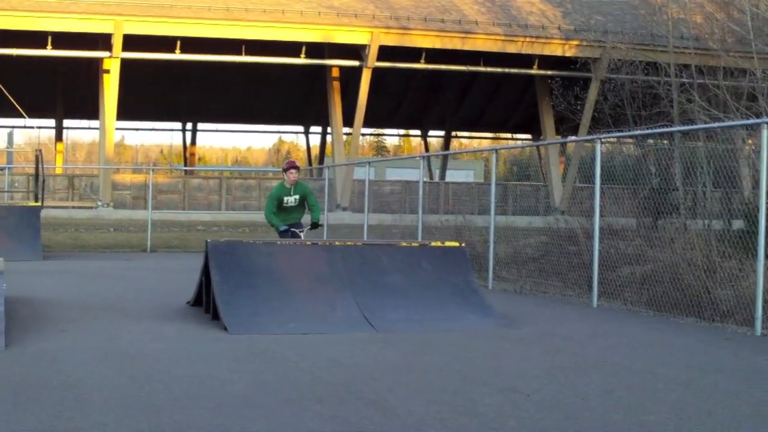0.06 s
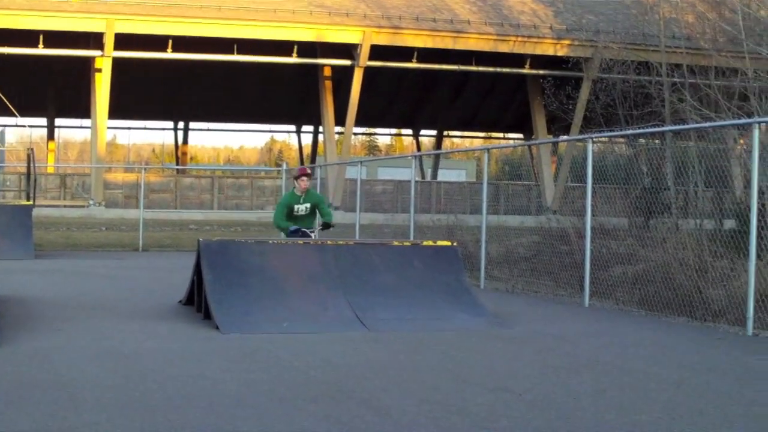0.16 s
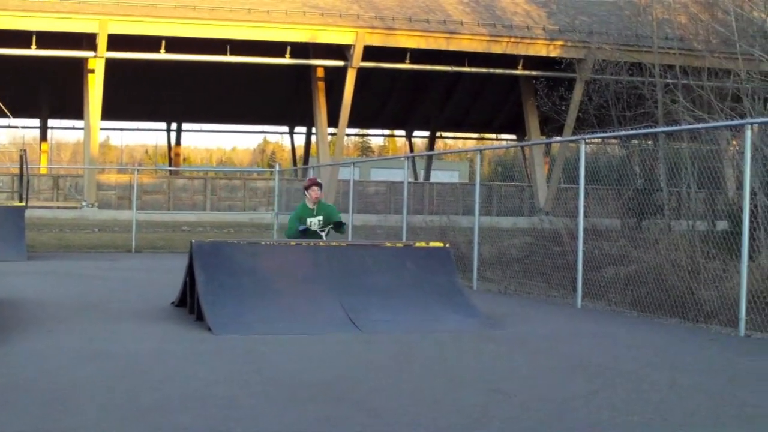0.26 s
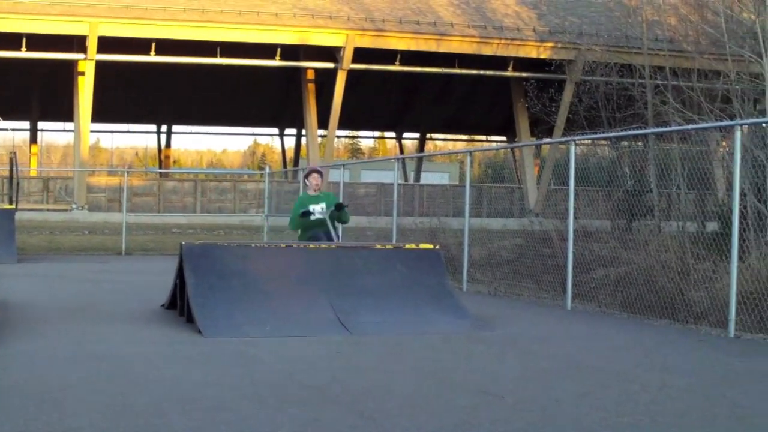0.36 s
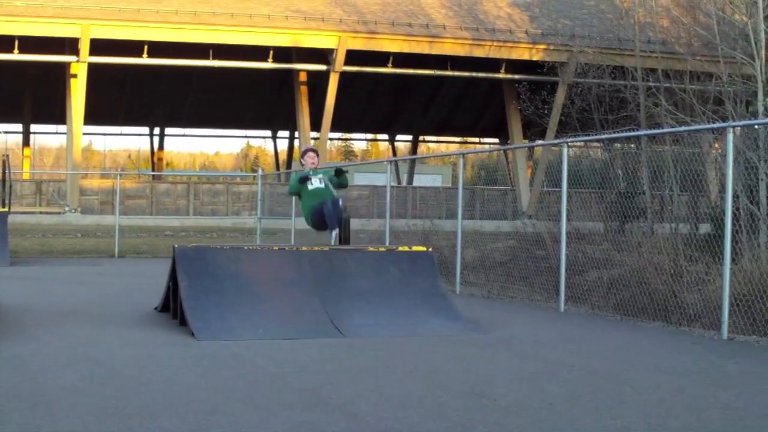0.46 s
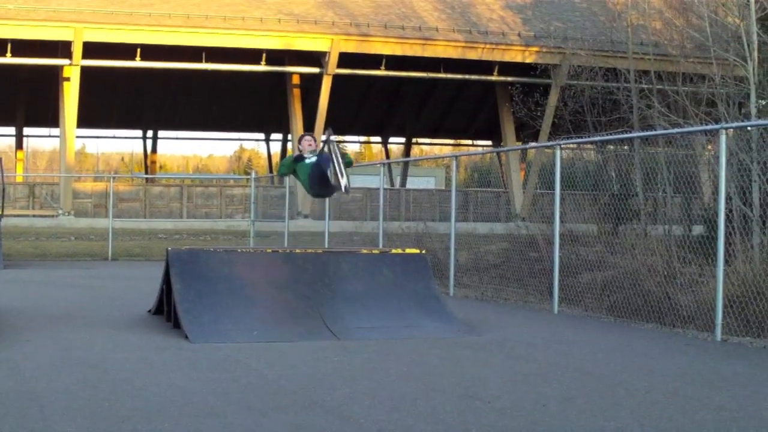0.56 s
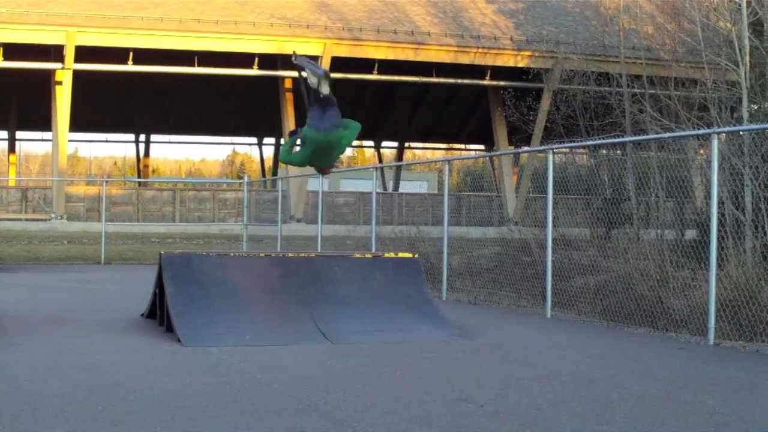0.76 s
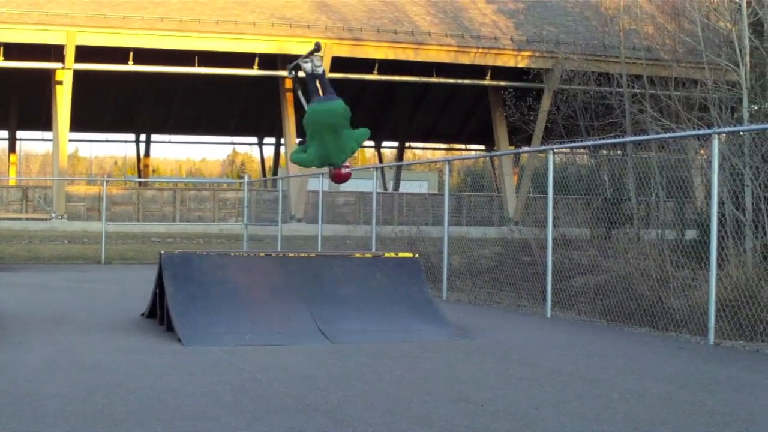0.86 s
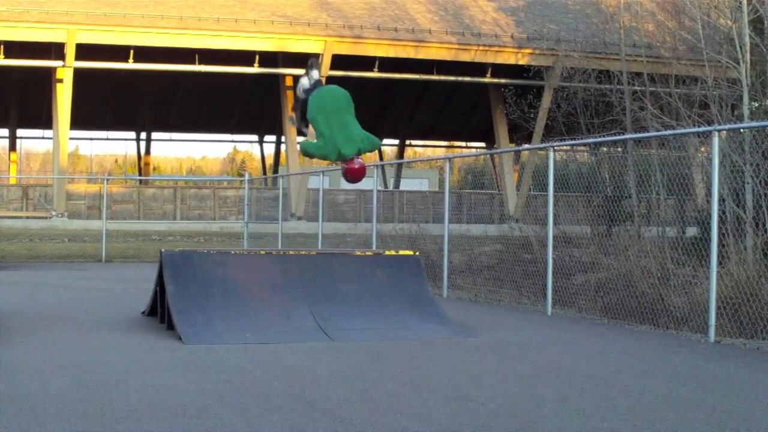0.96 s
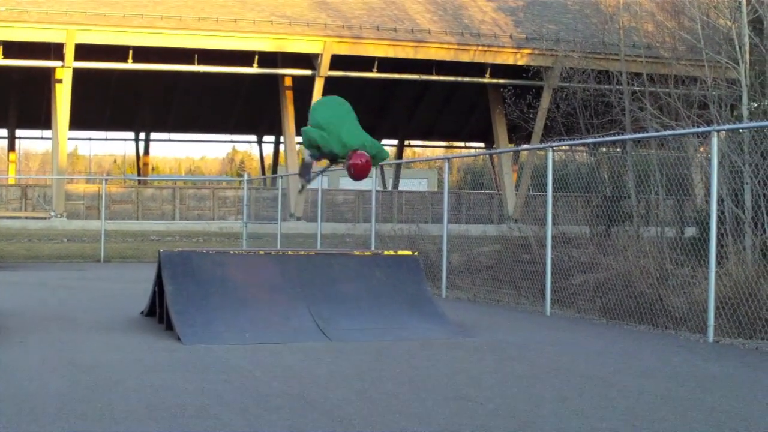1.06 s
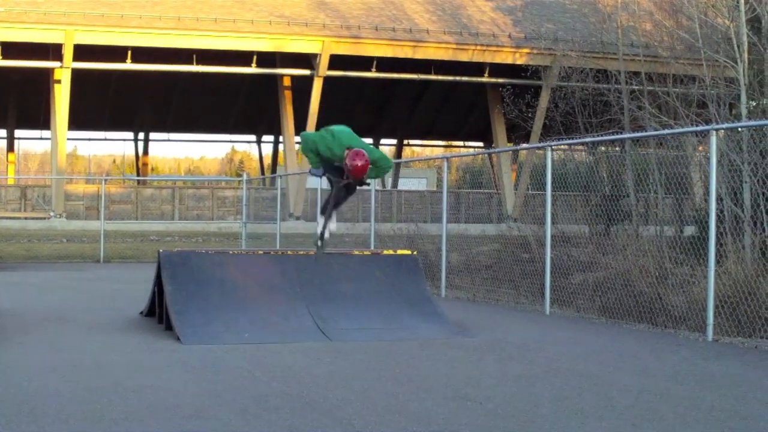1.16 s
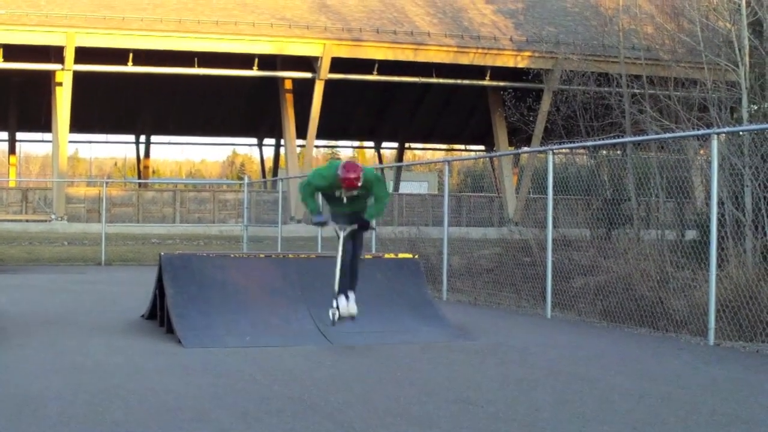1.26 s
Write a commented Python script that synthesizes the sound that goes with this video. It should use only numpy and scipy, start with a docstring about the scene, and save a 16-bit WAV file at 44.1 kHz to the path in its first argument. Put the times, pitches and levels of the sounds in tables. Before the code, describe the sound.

At an outdoor skatepark, front and rear wheels thump and clank onto a hollow ramp in quick succession. The ramp booms and a nearby roof echoes, while light rattles and clicks come from the airborne rider's frame.

```python
"""At a skatepark, a rider hits a hollow ramp and takes off. The front and rear wheels clank over its
steel foot plate, the deck panels thump, and the whole ramp bends and booms. A big open roof nearby
echoes and rings on for a second. A few small clicks follow while the rider is in the air, over a low
outdoor rumble with faint rolling and scraping farther off."""
import sys
import numpy as np
from scipy import signal
from scipy.fft import rfft, irfft, next_fast_len
from scipy.io import wavfile

SR = 44100
rng = np.random.default_rng(int(sys.argv[2]) if len(sys.argv) > 2 else 0)


def pcm_store(signal):
    """Save signal as 16-bit PCM."""
    levels = np.round(np.clip(np.atleast_2d(signal), -1, 1) * 32767)
    wavfile.write(sys.argv[1], SR, levels.astype(np.int16).T)


N = 57330
T = np.arange(N) / SR

# The notes the steel plate rings at. Each row: pitch in Hz, width in Hz, level in dB.
PLATE_NOTES = [(1753, 120, 2), (2060, 41, -2), (2856, 89, 1), (3453, 19, -23), (3630, 29, 1.5),
               (3870, 41, 2), (4450, 230, 0), (4640, 90, -9), (4770, 44, 7), (5020, 73, -2),
               (5260, 26, 7.5), (5700, 130, -11)]
# The front, then the rear wheels press on the ramp. Each row: start in seconds, level in dB.
WHEEL_LOADS = [(.243, -1.5), (.345, -1)]


def amp(db):
    """Turn decibels into a number to multiply by."""
    return 10 ** (np.asarray(db) / 20)


def unit(x):
    """Scale a sound so its average strength (rms) is 1."""
    return x / np.sqrt(np.mean(x ** 2) + 1e-20)


def along(points, hz):
    """Read between rows of (Hz, value), spaced as the ear hears pitch."""
    pitches, values = np.transpose(points)
    return np.interp(np.log(hz + 1), np.log(pitches + 1), values)


def filtered(x, response):
    """Multiply each frequency f in a sound by response(f)."""
    size = next_fast_len(N + SR // 2)
    return irfft(rfft(x, size) * response(np.fft.rfftfreq(size, 1 / SR)), size)[:N]


def shaped_noise(response):
    """Filtered hiss of strength 1."""
    return unit(filtered(rng.standard_normal(N), response))


def peak(f, hz, width):
    """A hump that favours the frequencies near hz."""
    return 1 / (1 + (2 * (f - hz) / width) ** 2)


def noise(colour, notes=()):
    """Noise of strength 1 with a colour (its balance of low and high) and any ringing notes."""
    ringing = lambda f: sum(amp(db) * peak(f, hz, width) for hz, width, db in notes)
    return shaped_noise(lambda f: amp(along(colour, f)) + ringing(f))


def since(start):
    """Seconds since the start, zero before it."""
    return np.maximum(T - start, 0)


def swell(start, rise):
    """A level that climbs from 0 towards 1; rise is in seconds."""
    return 1 - np.exp(-since(start) / rise)


def fade(start, t60, rise):
    """A level that rises, then dies away. The fade time t60 is the seconds it takes to drop 60 dB."""
    return swell(start, rise) * np.exp(-np.log(1000) * since(start) / t60)


def sine(start, hz):
    """A pure tone, silent before its start."""
    return np.sin(2 * np.pi * hz * since(start))


def outdoors():
    """A low rumble, wheels rolling far off and a thin, faint whine that fades in near the end."""
    # The colours of the rumble and the rolling. Each row: frequency in Hz, relative level in dB.
    rumble_colour = [(15, -2), (25, 0.5), (70, 0.5), (120, -9), (190, -12.5), (400, -22.5), (900, -23),
                     (1600, -32), (3300, -44), (8000, -44.5), (15500, -48)]
    rolling_colour = [(80, -15), (170, 4.5), (300, -0.5), (500, -18.5), (950, -6.5), (1500, -18),
                      (2800, -14.5), (3500, -22.5), (4800, -23.5), (7000, -44), (15000, -43)]
    # How loud the rolling is. Each row: time in seconds, level in dB.
    rolling_levels = [(0, -69), (.6, -50.5), (.95, -57), (1.1, -57.5), (1.2, -53), (1.3, -56.5)]
    rolling = amp(np.interp(T, *np.transpose(rolling_levels))) * noise(rolling_colour)
    whine = amp(-76) * swell(0.85, rise=0.06) * sine(0.85, hz=7950)
    return amp(-46.5) * noise(rumble_colour) + rolling + whine


def scrapes():
    """Faint scrapes farther off, each a short, soft swell of noise around one pitch."""
    # Each row: middle in seconds, level in dB, pitch in Hz, width in Hz, half length in seconds.
    far_scrapes = [(1.094, -68, 2750, 350, .05), (1.192, -63.5, 4520, 2000, 0.038),
                   (1.262, -60.5, 980, 200, 0.056), (1.295, -69, 4770, 400, 0.033)]
    out = np.zeros(N)
    for middle, db, hz, width, half_length in far_scrapes:
        hiss = shaped_noise(lambda f: peak(f, hz, width))
        out += amp(db) * hiss * np.exp(-((T - middle) / half_length) ** 2)
    return out


def rattles():
    """The frame rattles in thin, short bursts."""
    # Each row: start in seconds, level in dB.
    bursts = [(0.423, -45), (0.439, -40), (0.471, -44), (.495, -52), (.5215, -36), (.529, -52),
              (0.551, -47), (0.612, -49.5), (.826, -60)]
    # The rattle's colour. Each row: frequency in Hz, relative level in dB.
    colour = [(3000, -11), (7000, -11), (11500, -7.5), (16000, -19)]
    return sum(amp(db) * noise(colour) * fade(start, t60=0.045, rise=0.0015) for start, db in bursts)


def clicks():
    """Small, dry clicks in mid-air, each a snap, a short ring and a knock."""
    # Each row: start in seconds, level in dB, pitch in Hz, fade time in seconds,
    # then the snap and the knock in dB compared with the ring.
    air_clicks = [(.523, -29, 1664, 0.022, -10, -13), (.8513, -34, 2380, 0.015, -7.5, 6.5),
                  (1.1643, -50.5, 2350, 0.022, -4.5, 12)]
    # The snap's colour. Each row: frequency in Hz, relative level in dB.
    snap_colour = [(500, -7), (2500, -6), (3800, -1.5), (4800, -5), (5900, -4), (8000, -13.5), (12000, -16),
                   (16000, -14)]
    out = np.zeros(N)
    for start, db, hz, t60, snap_db, knock_db in air_clicks:
        ring = sine(start, hz) + amp(-9) * sine(start, hz * 1.58)
        knock = amp(knock_db) * sine(start, hz=762)
        snap = amp(snap_db) * noise(snap_colour) * fade(start, t60=0.011, rise=0.0001)
        out += amp(db) * ((ring + knock) * fade(start, t60, rise=0.00076) + snap)
    return out


def roof_wash():
    """The roof answers each wheel load with a blur of echoes, tinged by the plate's ring."""
    # The echoes' colour. Each row: frequency in Hz, relative level in dB.
    colour = [(25, -4.5), (55, 7.5), (100, -3.5), (170, 2), (230, -7), (300, -1), (400, -15.5), (500, -20),
              (680, -14), (1100, -17.5), (1400, -27), (1800, -22.5), (2600, -25.5), (3700, -21.5),
              (4900, -20.5), (6300, -26.5), (10000, -35), (16000, -55)]
    # How long they last. Each row: frequency in Hz, fade time in seconds.
    fade_times = [(60, 1.2), (170, 1.37), (300, 1.55), (450, 1.51), (700, 1.94), (2000, 1.32),
                  (5000, 1.206), (9000, 1.13), (15000, 1.5)]
    tinge = [(hz, width, db - 26) for hz, width, db in PLATE_NOTES]
    out = np.zeros(N)
    for start, load_db in WHEEL_LOADS:
        # Split the noise into bands so each can fade at its own speed.
        hz, t, bands = signal.stft(noise(colour, tinge), SR, nperseg=512)
        decay = np.exp(-np.log(1000) * np.maximum(t - start, 0) / along(fade_times, hz)[:, None])
        wash = signal.istft(bands * decay, SR, nperseg=512)[1][:N]
        out += amp(-26.5 + load_db) * wash * swell(start, rise=0.005)
    return out


def wall_echo(x):
    """A wall sends back one clear, late copy with less deep bass."""
    delay_s, bass_cut_hz = 0.176, 150
    return amp(-14) * filtered(x, lambda f: np.exp(-2j * np.pi * f * delay_s) * f / np.hypot(f, bass_cut_hz))


def ramp_boom():
    """The hollow ramp rings after each wheel load, every note wavering in loudness."""
    # Each row: pitch in Hz, level in dB, fade time in seconds.
    ramp_notes = [(55, -33.5, 2.7), (95.64, -34, 1.83), (163.54, -36, 2.38), (174.3, -36, 0.91),
                  (254, -38, 0.96), (283.5, -35, 1.3), (292, -32, .8), (337.8, -42, 1.26),
                  (630, -43.5, 1.4), (660, -50.5, 1.3), (754, -50.5, 1.94), (784, -48, 0.42),
                  (1047, -49.5, .9)]
    out = np.zeros(N)
    for start, load_db in WHEEL_LOADS:
        for hz, db, t60 in ramp_notes:
            waver = 1 + 0.35 * shaped_noise(lambda f: np.exp(-(f / 14) ** 2))
            out += amp(load_db + db) * waver * fade(start, t60, rise=0.0098) * sine(start, hz)
    return out


def ramp_flex():
    """The whole ramp gives under the rider in one deep heave."""
    middle_s, half_length_s, hz = 0.341, 0.026, 55.8
    t = T - middle_s
    return amp(-16) * np.exp(-(t / half_length_s) ** 2) * np.sin(2 * np.pi * hz * t)


def deck_thumps():
    """The deck panels thump under the wheels, swinging only a few times before they stop."""
    # Each row: start in seconds, peak level in dB, pitch in Hz, rise time in seconds.
    thumps = [(0.2422, -24, 265, 0.0026), (0.2441, -25, 110, 0.005), (.2500, -26, 245, 0.0048),
              (0.2643, -15.5, 156, .006), (0.298, -22.5, 131.4, 0.014), (0.3224, -12.5, 156, 0.0015),
              (0.3346, -16, 254, 0.002), (0.346, -13, 168, 0.0061), (.372, -20.5, 294, .011),
              (0.383, -22, 98.7, 0.018)]
    out = np.zeros(N)
    for start, db, hz, rise in thumps:
        age = since(start) / rise
        out += amp(db) * age * np.exp(1 - age) * sine(start, hz)
    return out


def wheel_blows():
    """Each blow of a wheel clanks and rings the steel plate and knocks the deck behind it."""
    # Each row: start in seconds, clank, ring and knock levels in dB, fade time in seconds.
    blows = [(0.2414, -28.5, -27.5, -23.5, 0.051), (0.261, -31.5, -31.5, -23, 0.064),
             (.278, -40, -44, -25, 0.095), (0.3206, -33.5, -29.5, -21, 0.077),
             (0.328, -30, -33, -25.5, 0.1), (0.339, -27, -22.5, -34, 0.055), (0.3419, -27, -23, -21, 0.073),
             (0.359, -32, -41, -22.5, 0.045), (0.372, -32, -52, -29.5, 0.077)]
    # The colours of the clank, the hiss between the plate's notes, and the knock.
    # Each row: frequency in Hz, relative level in dB.
    clank_colour = [(600, -20), (1300, -16.5), (1900, -1), (2500, -7.5), (3200, -7), (4000, -4.5),
                    (5400, -3), (6400, -14), (9000, -14.5), (13000, -21.5), (16000, -34)]
    ring_colour = [(500, -38), (3500, -27), (5000, 2), (6500, -32), (15000, -35)]
    knock_colour = [(100, -17), (200, -0.5), (300, -3), (400, -5.5), (490, -14.5), (640, -11), (850, -12.5),
                    (1050, -17.5), (1400, -25), (3000, -41.5)]
    # The notes of the knocked deck. Each row: pitch in Hz, width in Hz, level in dB.
    deck_notes = [(383, 66, -15), (625, 35, 1.5), (778, 25, -5.5), (1035, 51, -6.5)]
    out = np.zeros(N)
    for start, clank_db, ring_db, knock_db, t60 in blows:
        clank = amp(clank_db) * noise(clank_colour)
        ring = amp(ring_db) * noise(ring_colour, PLATE_NOTES)
        knock = amp(knock_db) * noise(knock_colour, deck_notes)
        out += (clank + ring) * fade(start, t60, rise=0.0015) + knock * fade(start, t60, rise=0.0013)
    return out


def scene():
    """Add all the sounds into one channel."""
    thud = deck_thumps() + ramp_flex()
    takeoff = wheel_blows() + thud + wall_echo(thud) + ramp_boom() + roof_wash()
    return (takeoff + rattles() + clicks() + scrapes() + outdoors())[None]


def record(dry):
    """Cut off the very highest treble."""
    return filtered(dry[0], lambda hz: hz < 15900)[None]


dry = scene()
out = record(dry)
pcm_store(out)
```